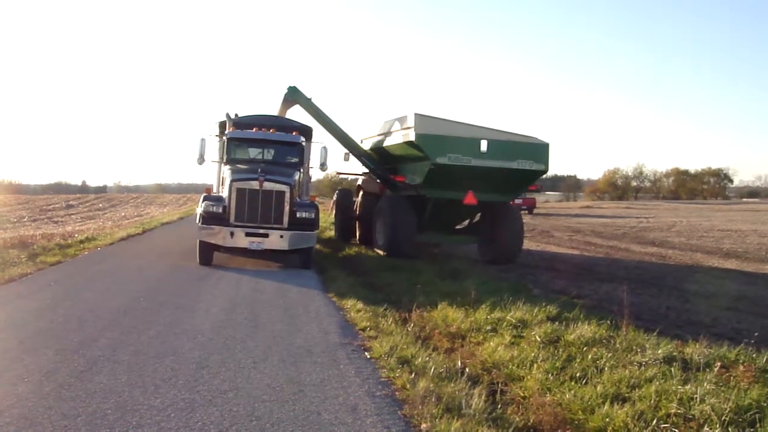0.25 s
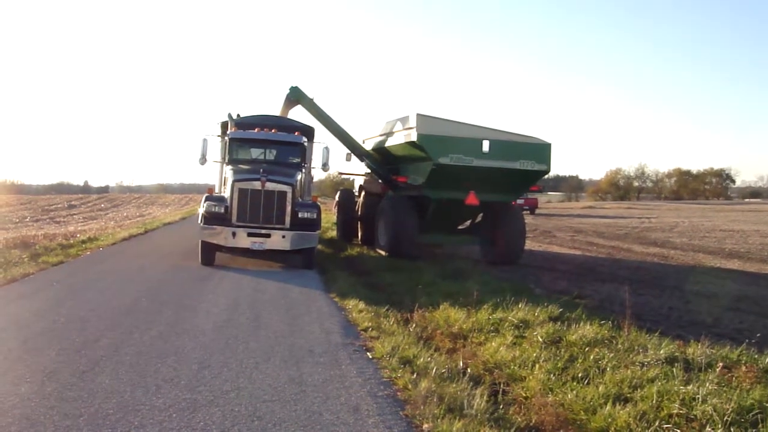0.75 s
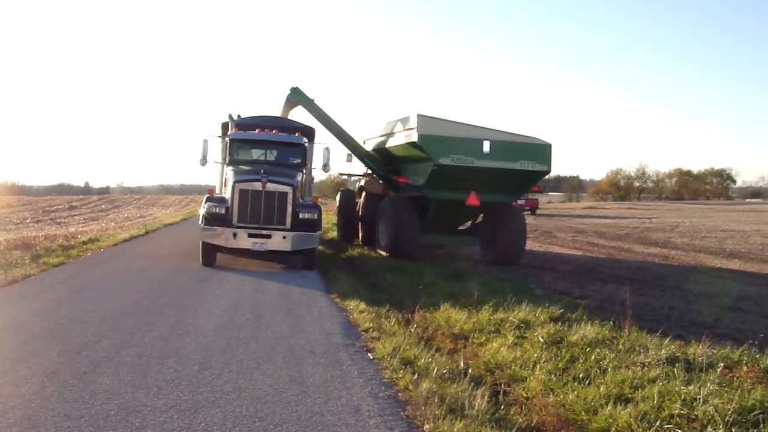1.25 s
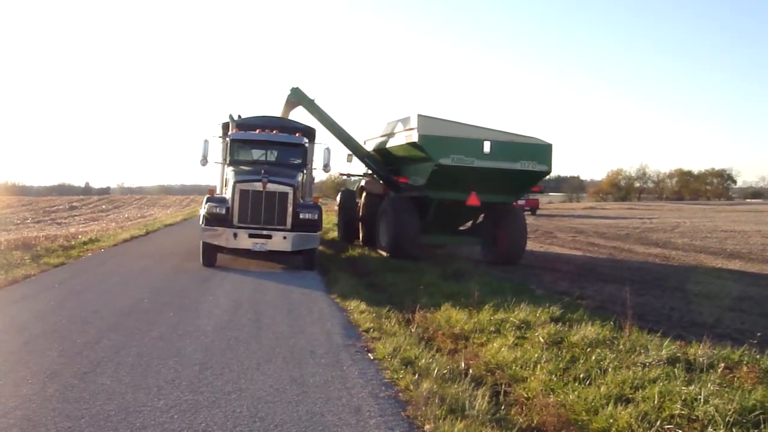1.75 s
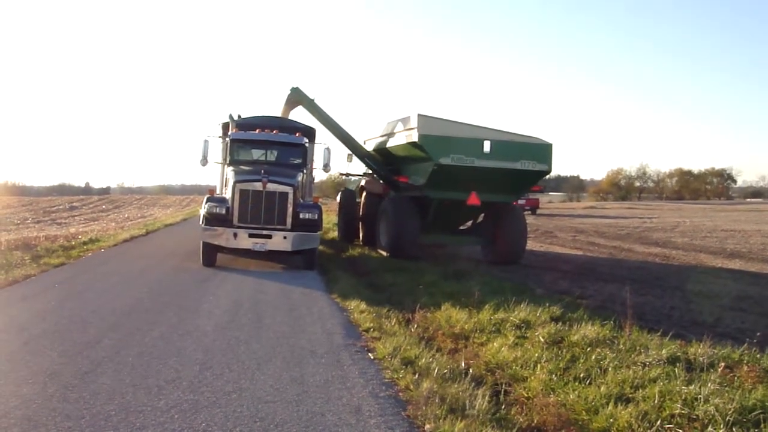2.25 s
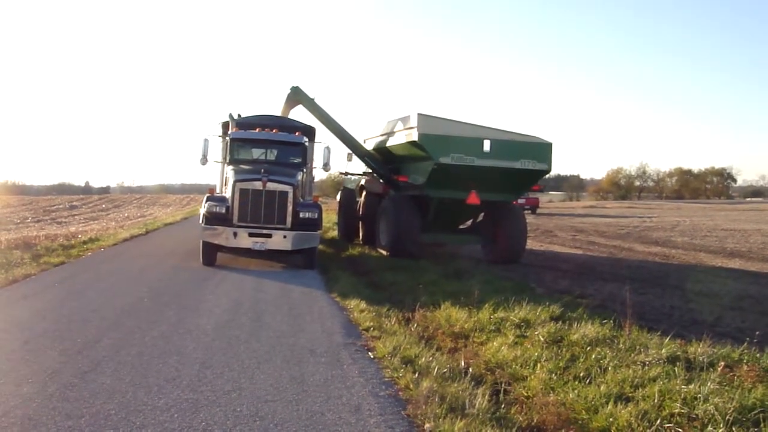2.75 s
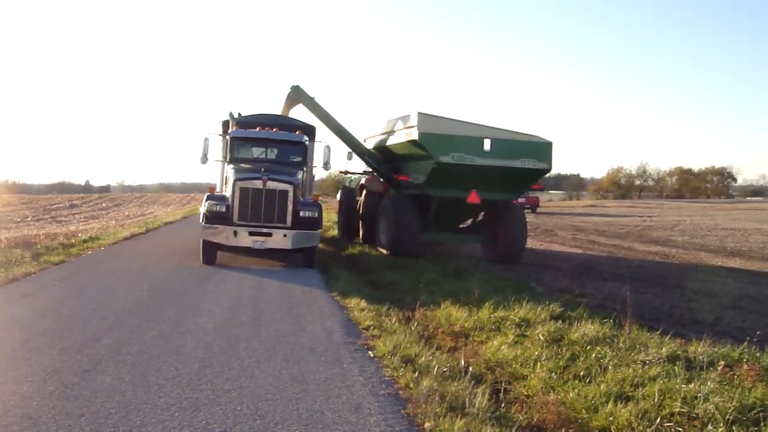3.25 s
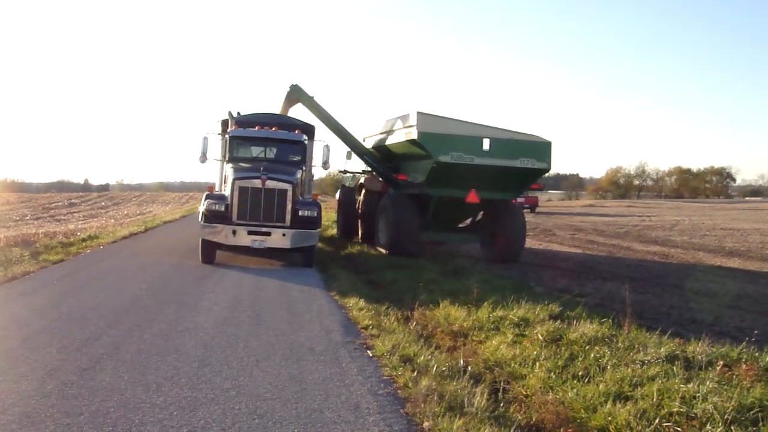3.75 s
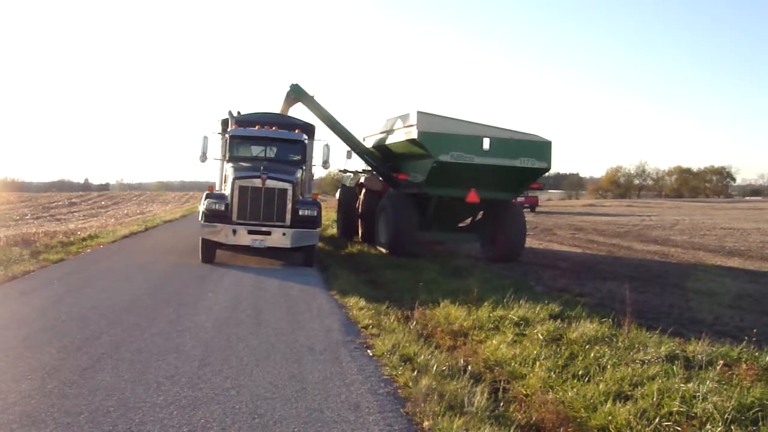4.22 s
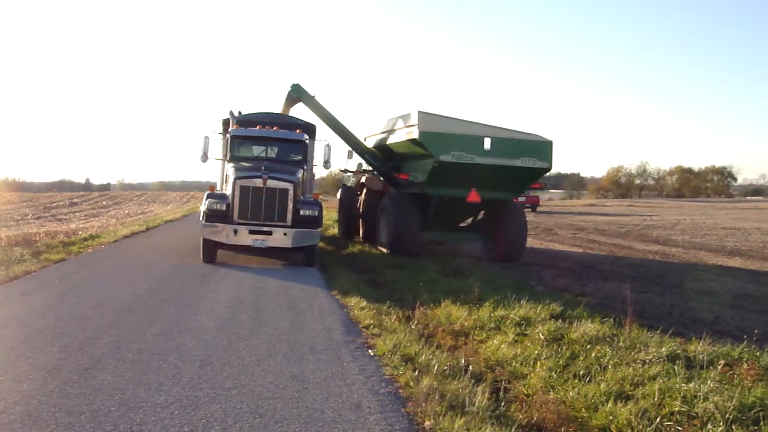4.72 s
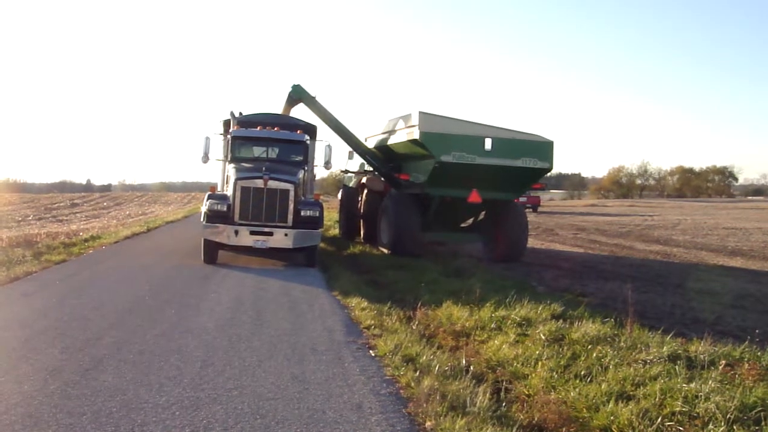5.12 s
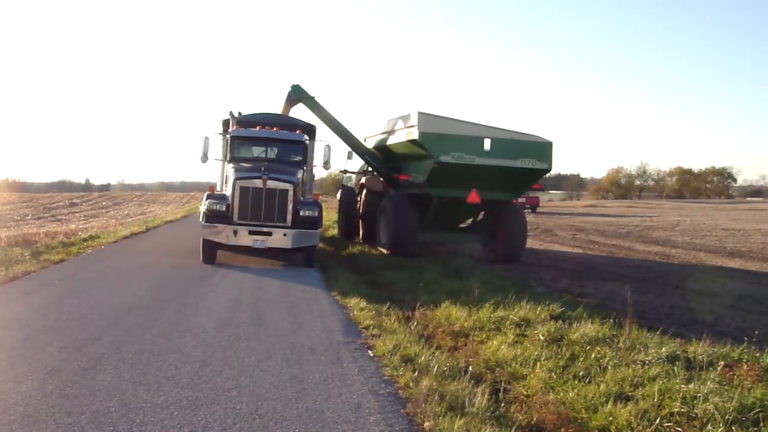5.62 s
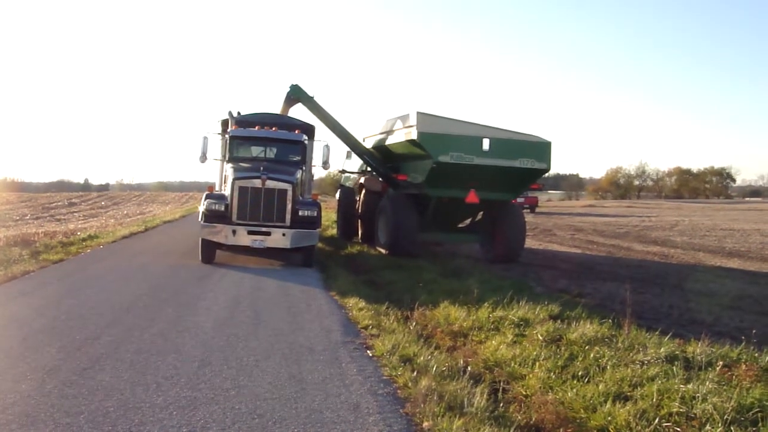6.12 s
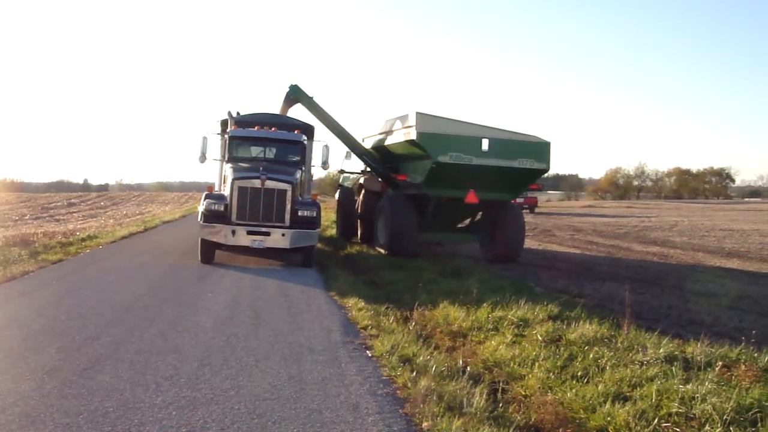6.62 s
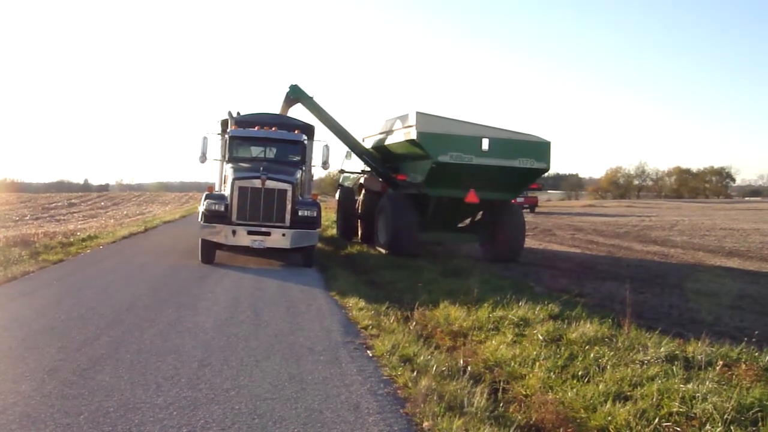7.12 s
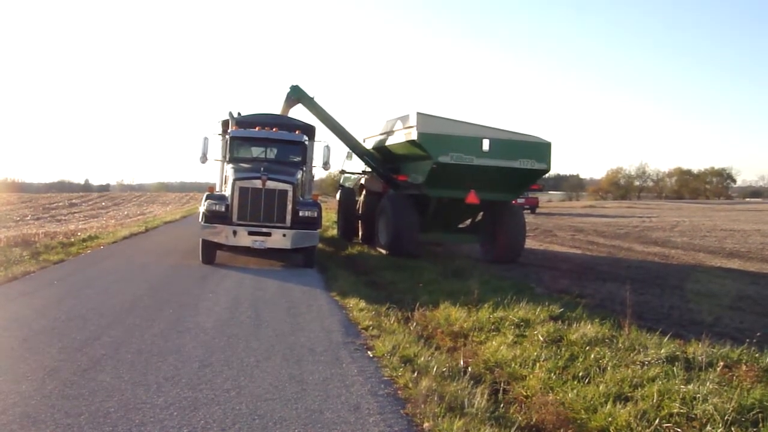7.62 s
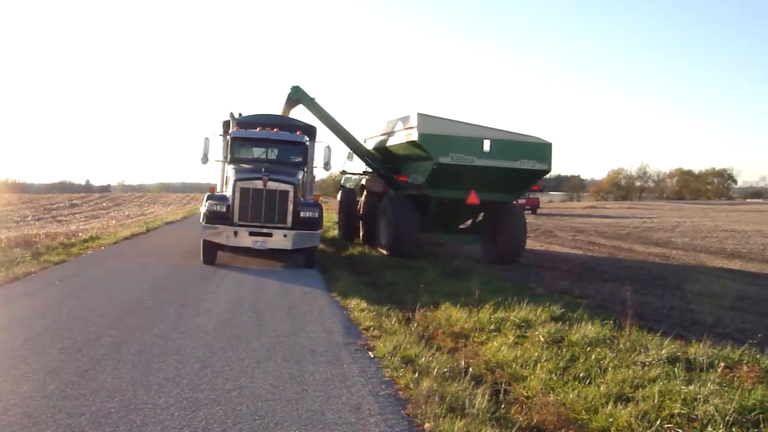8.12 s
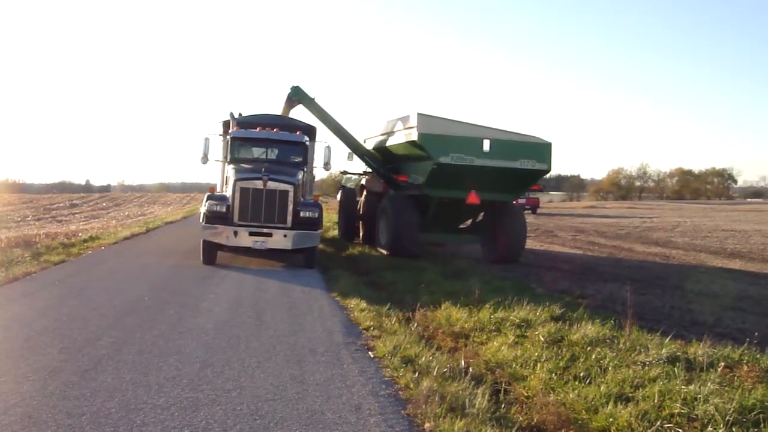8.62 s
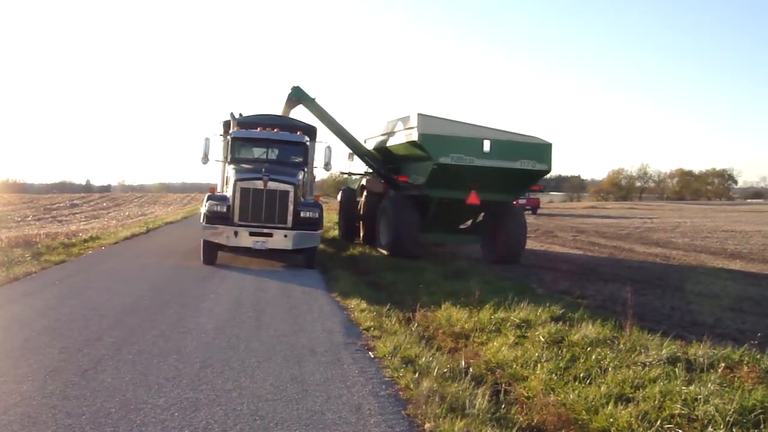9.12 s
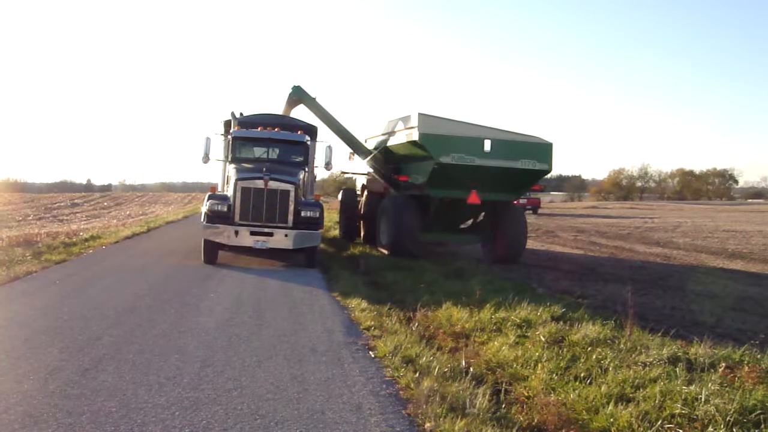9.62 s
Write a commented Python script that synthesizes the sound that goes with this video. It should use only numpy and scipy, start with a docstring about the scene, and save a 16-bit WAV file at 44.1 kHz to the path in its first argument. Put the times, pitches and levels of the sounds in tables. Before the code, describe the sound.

A dense rattling hiss of beans streams through a ringing steel auger, gears whining and diesel humming, while wind twice buffets the microphone.

```python
"""Dried beans hiss from a grain cart's auger into a truck trailer on an open country road.
Beans are dense random impacts, surging slightly with each turn; the screw's rubs ring tube resonances.
Gear whine is a bank of tooth-rate tones that sags under load; a diesel is low tones over filtered noise.
Wind is shaped noise on two microphone ports; two strong gusts make the gain control duck."""
import sys
import numpy as np
from scipy import signal
from scipy.fft import rfft, irfft, next_fast_len
from scipy.io import wavfile
from scipy.ndimage import uniform_filter1d

SR = 44100
rng = np.random.default_rng(int(sys.argv[2]) if len(sys.argv) > 2 else 0)


def generate_wav(sig):
    """Save sig (samples, or channels by samples) to the path in sys.argv[1] as 16-bit PCM at SR."""
    pcm = np.round(np.clip(np.atleast_2d(sig).T, -1, 1) * 32767).astype(np.int16)
    wavfile.write(sys.argv[1], SR, pcm)


N = 434826


def from_db(db):
    """Decibels to amplitude gain."""
    return 10 ** (np.asarray(db) / 20)


def rms_one(x):
    """Scale to unit power."""
    return x / np.sqrt(np.mean(x ** 2) + 1e-20)


def colour(x, points, share=1):
    """Filter by a share of a (Hz, dB) curve, interpolated over log frequency."""
    hz, db = np.transpose(points)
    size = next_fast_len(N + 4096)
    grid_hz = np.maximum(np.arange(size // 2 + 1) * SR / size, 1)
    gain = from_db(share * np.interp(np.log(grid_hz), np.log(hz), db))
    return irfft(rfft(x, size) * gain, size)[..., :N]


def density_noise():
    """Two channels of white noise with unit power per Hz."""
    return rng.standard_normal((2, N)) * np.sqrt(SR / 2)


def drift(rate_hz):
    """Slow random wander with spread 1: low-passed noise."""
    step = 40  # samples between computed points
    r = np.exp(-2 * np.pi * rate_hz * step / SR)
    settle = 2000
    noise = rng.standard_normal(N // step + settle + 2)
    slow = signal.lfilter([1], [1, -2 * r, r * r], noise)[settle:]
    return np.interp(np.arange(N) / step, np.arange(len(slow)), rms_one(slow))


def resonate(x, hz, width_hz):
    """One two-pole resonance with gain about 1 at its peak."""
    r = np.exp(-np.pi * width_hz / SR)
    zeros = np.array([1, 0, -1]) * (1 - r * r) / 2
    poles = [1, -2 * r * np.cos(2 * np.pi * hz / SR), r * r]
    return signal.lfilter(zeros, poles, x)


def swing(turns, peak_at):
    """A cosine that peaks at a given part of each turn."""
    return np.cos(2 * np.pi * (turns - peak_at))


def spread(direct, scattered):
    """Direct sound is alike in both channels; scattered sound is opposite in them."""
    # diffuse share of the sound: hz, side_minus_mid_db
    diffuse = [(100, -23), (400, -7), (600, -9.5), (1800, -15.5), (5500, -13), (6400, -7), (11000, -9.5)]
    return direct + colour(scattered, diffuse) * np.array([[1], [-1]])


def beans(turns, hits_per_s=30000, size_db=3.0, surge_db=0.5, clump_db=0.35):
    """A torrent of tiny impacts on beans and metal, thicker once a turn and in chance clumps."""
    # impact spectrum: hz, level_db_per_hz
    impact_spectrum = [(300, -92), (480, -66.5), (720, -60), (1250, -61), (1750, -56.5), (2180, -58),
                       (2450, -55.5), (3850, -55), (4500, -52.5), (5900, -56), (6900, -59), (8500, -59.5),
                       (10300, -61.5), (11000, -67)]
    sizes = from_db(size_db * np.minimum(rng.exponential(1, (2, N)), 4))
    signs = rng.choice([-1, 1], (2, N))
    struck = rng.random((2, N)) < hits_per_s / SR
    hits = rms_one(sizes * signs * struck) * np.sqrt(SR / 2)  # unit power per Hz
    flow = from_db(surge_db * swing(turns, peak_at=0.57) + clump_db * drift(rate_hz=13.0))
    return flow * spread(*colour(hits, impact_spectrum))


def tube(turns, rub_db=2.0, wobble_db=0.96, uneven_db=0.9):
    """The screw scrapes its tube twice a turn, once harder, and the steel rings."""
    # steel tube modes: pitch_hz, width_hz (of the first of two resonators), level_db
    modes = [(587, 55, -46.5), (799, 43, -39.5), (990, 66, -36), (1055, 103, -33), (1157, 21, -48.5),
             (1447, 112, -35), (1535, 74, -35.5), (1885, 140, -36.5)]
    pressure_db = rub_db * swing(2 * turns, peak_at=0.61)
    pressure_db += wobble_db * swing(turns, peak_at=0.27)
    pressure_db += uneven_db * drift(rate_hz=19)
    scrape = rng.standard_normal((2, N)) * from_db(pressure_db)
    rings = np.zeros((2, N))
    for pitch_hz, width_hz, level_db in modes:
        ring = resonate(resonate(scrape, pitch_hz, width_hz), pitch_hz, 2 * width_hz)
        rings += from_db(level_db) * rms_one(ring)
    return spread(*rings)


def chirps(turns, pitch_hz=1078, unsteady_hz=14, usual_db=-37, uneven_db=2.5, lift_off_db=12):
    """Once a turn the screw bears on the tube and one mode sings, mostly faintly, a few times hard."""
    # hardest rubs of the screw: peak_s, level_db
    hard_rubs = [(1.153, -26), (2.93, -29), (4.44, -26), (7.896, -26)]
    phase = 2 * np.pi * np.cumsum(pitch_hz + unsteady_hz * drift(rate_hz=24.0)) / SR
    bearing_db = lift_off_db * (swing(turns, peak_at=0.37) - 1)
    usual = from_db(usual_db + uneven_db * drift(rate_hz=2.7) + bearing_db)
    hard = sum(from_db(level_db) * swell(peak_s) for peak_s, level_db in hard_rubs)
    return rms_one(np.sin(phase)) * np.maximum(usual, hard)


def swell(peak_s, width_s=.026):
    """The bell-shaped pressure of one rub, height 1, falling to 1/e at width_s."""
    offset = (np.arange(N) / SR - peak_s) / width_s
    return np.exp(-np.minimum(offset ** 2, 50))


def drive(tooth_hz=197.15, sag_hz=3.9, recovery_hz_per_s=0.28, load_at_s=5.48, load_rise_s=0.45):
    """Tooth rate in Hz and load 0-1: light, a sag under load, then the governor slowly wins speed back."""
    since_s = np.arange(N) / SR - load_at_s
    load = np.clip(since_s / load_rise_s, 0, 1)
    recovery_hz = recovery_hz_per_s * np.maximum(since_s - load_rise_s, 0)
    return tooth_hz - sag_hz * load + recovery_hz, load


def gears(teeth, turns, load, throb_db=0.38, waver_db=1.86, wander_rad=0.037, play_rad=0.035):
    """Tooth-mesh tones throb with every turn of the screw and waver in the moving air."""
    # gear whine: multiple (of the tooth rate), light_db, loaded_db
    whine = [(2, -60, -55), (3, -54, -50.5), (4, -49, -42.5), (4.755, -44, -44), (4.89, -45, -35.5),
             (5, -40.5, -41), (6, -48, -46), (7, -47, -52), (9, -30.2, -35.5), (10, -39.5, -37),
             (12, -38.5, -36.5), (13, -43, -41), (14, -44, -41), (16, -43, -47), (18, -39, -55),
             (19, -44, -40)]
    throb = throb_db * swing(turns, peak_at=0.044)
    out = np.zeros(N)
    for multiple, light_db, loaded_db in whine:
        # play in the gears shakes the phase of high multiples most; so does the throb their level
        play = play_rad * swing(turns, peak_at=rng.random())
        shift_rad = multiple * (play + wander_rad * drift(rate_hz=2.3))
        tone = np.sin(2 * np.pi * (multiple * teeth + rng.random()) + shift_rad)
        tone = rms_one(tone * from_db(multiple * throb + waver_db * drift(rate_hz=5.0)))
        out += tone * from_db(light_db + load * (loaded_db - light_db))
    return out


def diesel(waver_db=3.0, wander_rad=0.3):
    """Low, wavering firing tones over a steady rumble of filtered noise."""
    # firing tones: pitch_hz, level_db
    drone = [(70, -51), (141, -60)]
    # rumble spectrum: hz, level_db_per_hz
    rumble = [(30, -56), (70, -77), (130, -75), (210, -68.5), (300, -69.5), (420, -69), (560, -66),
              (800, -65), (2000, -78)]
    t = np.arange(N) / SR
    tones = np.zeros(N)
    for pitch_hz, level_db in drone:
        tone = rms_one(np.sin(2 * np.pi * pitch_hz * t + wander_rad * drift(rate_hz=2.8)))
        tones += from_db(level_db + waver_db * drift(rate_hz=4.7)) * tone
    return tones + spread(*colour(density_noise(), rumble))


def wind(breeze_db=-42.5, lumpy_db=2.5, puff_db=0.5, common_db=-18):
    """Eddies press on the two ports mostly in opposite senses: a light, puffy breeze and a few gusts."""
    # buffeting spectrum, shape only: hz, relative_db
    buffet = [(20, 25), (35, 7.5), (70, 9), (120, -3.5), (220, 4.5), (300, 0), (450, -12.5), (700, -30),
              (2000, -52)]
    # gusts: start_s, level_db (before puffs and colour), rise_s, hold_s
    gust_rows = [(0.14, -22, 0.031, .01), (4.649, -9.5, 0.29, .015), (6.92, -11, .006, .06)]
    # a gust against the breeze, more deep push and more small, bright eddies: hz, gain_db
    gust_colour = [(30, 0.5), (75, -6), (200, 0), (450, 2.5)]
    eddies = colour(rng.standard_normal((2, N)), buffet)
    eddies = eddies / np.sqrt(uniform_filter1d(eddies ** 2, size=700, axis=-1))  # evens the level
    pressure = eddies[0] * np.array([[1], [-1]]) + from_db(common_db) * eddies[1]
    breeze = from_db(breeze_db + lumpy_db * drift(rate_hz=5.4) + puff_db * drift(rate_hz=14))
    gusts = sum(gust(*row) for row in gust_rows)
    return breeze * pressure + colour(gusts * pressure, gust_colour)


def gust(start_s, level_db, rise_s, hold_s):
    """Wind pressure builds, holds, dies away and is gone, in a run of uneven puffs."""
    puffs_per_s, puff_depth_db, jitter_puffs = 40, 4, .15
    fall_db_per_s, fall_s = 170, .09
    age_s = np.arange(N) / SR - start_s
    fading_s = np.maximum(age_s - rise_s - hold_s, 0)
    puffs = puffs_per_s * age_s + jitter_puffs * drift(rate_hz=13)
    puffs_db = puff_depth_db * swing(puffs, peak_at=0.38)
    level = from_db(level_db + puffs_db - fall_db_per_s * fading_s)
    return np.clip(age_s / rise_s, 0, 1) * level * (fading_s < fall_s)


def ports(left, right):
    """The two microphone ports hear differently; each takes half of the difference in colour."""
    # port difference: hz, left_minus_right_db
    port_difference = [(60, 3), (550, 4), (760, 0.3), (950, 4.5), (1300, -0.5), (2300, 0.6), (3300, 0),
                       (3650, 3), (4700, 1), (5600, -4.5), (6300, -4.5), (7500, 0), (9300, 3), (11000, 3)]
    return np.array([colour(left, port_difference, share=.5), colour(right, port_difference, share=-.5)])


def scene(teeth_per_turn=27):
    """One shaft drives the gears and the screw; all is heard through the two ports."""
    tooth_hz, load = drive()
    teeth = np.cumsum(tooth_hz) / SR
    turns = teeth / teeth_per_turn
    machine = tube(turns) + chirps(turns) + gears(teeth, turns, load) + diesel()
    return ports(*(beans(turns) + machine + wind()))


def gain_control(x, threshold_db=-14.0, release_db_per_s=28):
    """Turns down promptly when the level passes the threshold and comes back slowly."""
    power = uniform_filter1d(np.mean(x ** 2, axis=0), size=800)
    excess_db = np.maximum(10 * np.log10(power + 1e-12) - threshold_db, 0)
    recovery_db = release_db_per_s * np.arange(N) / SR
    # peak hold that leaks at the release rate
    cut_db = np.maximum.accumulate(excess_db + recovery_db) - recovery_db
    return x * from_db(-uniform_filter1d(cut_db, size=200))


def record(dry, wind_cut_hz=100, top_cut_hz=11050):
    """Gain control, then a wind filter on the bass and a steep cut on top."""
    wind_filter = signal.butter(4, wind_cut_hz, "high", fs=SR, output="sos")
    top_filter = signal.ellip(14, .1, 90, top_cut_hz, fs=SR, output="sos")
    return signal.sosfilt(top_filter, signal.sosfilt(wind_filter, gain_control(dry)))


dry = scene()
out = record(dry)
generate_wav(out)
```